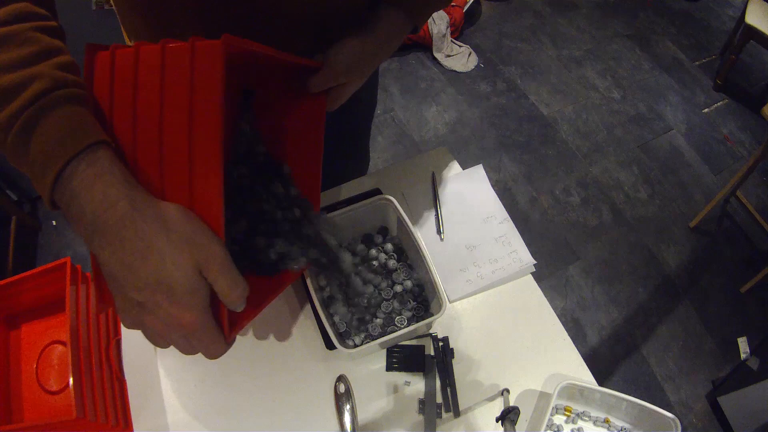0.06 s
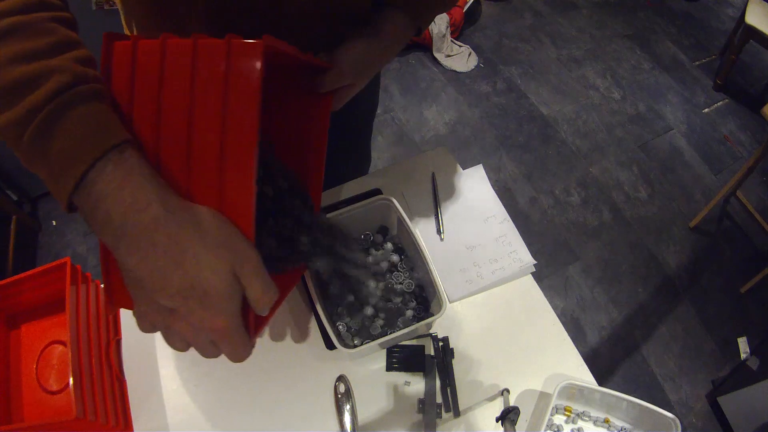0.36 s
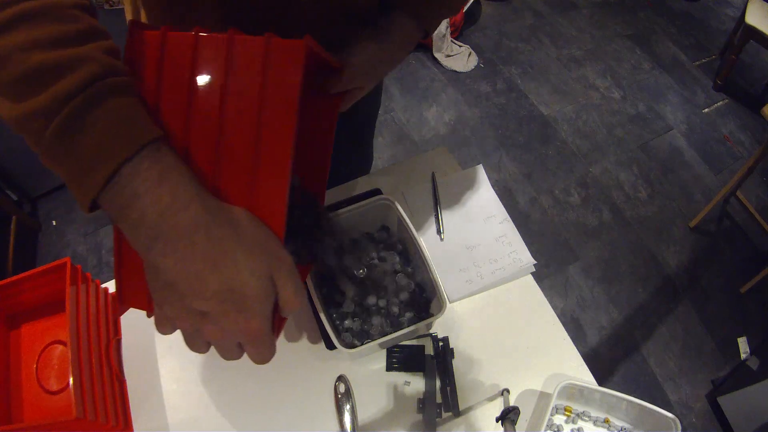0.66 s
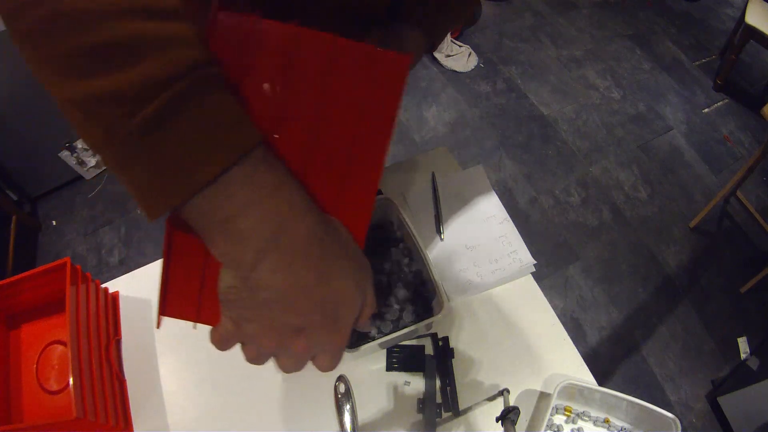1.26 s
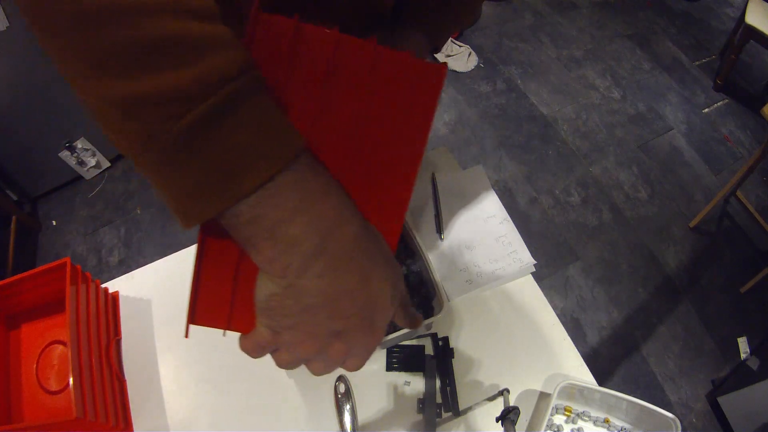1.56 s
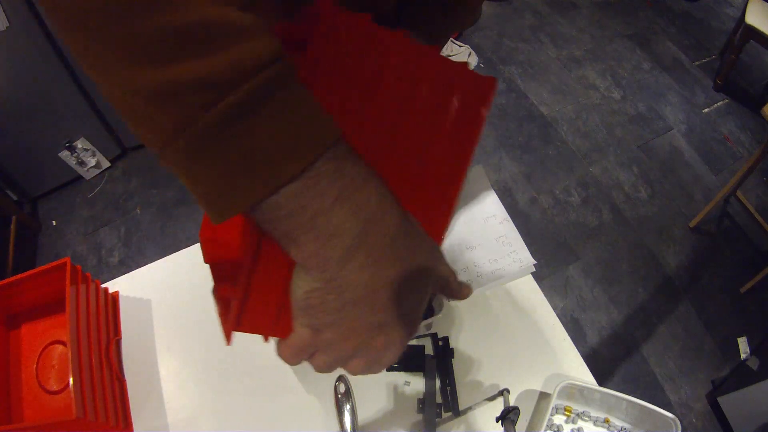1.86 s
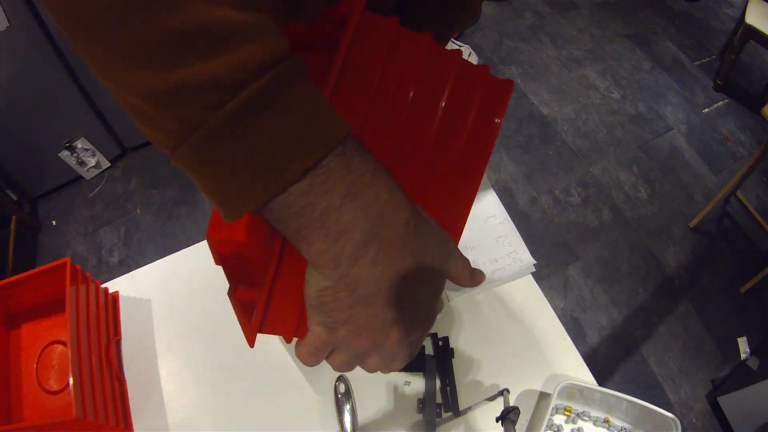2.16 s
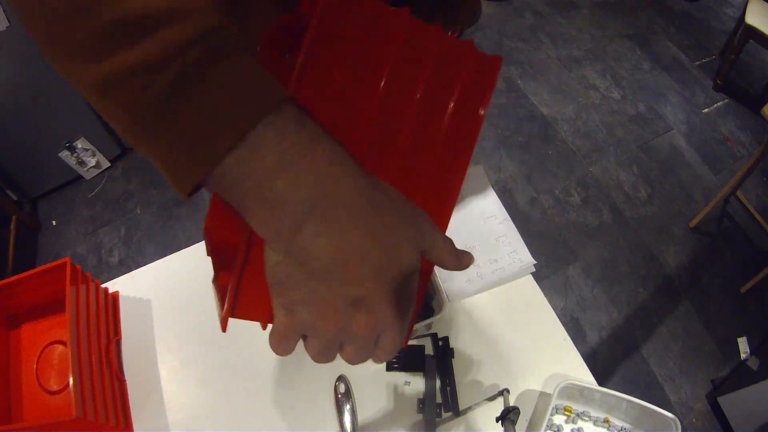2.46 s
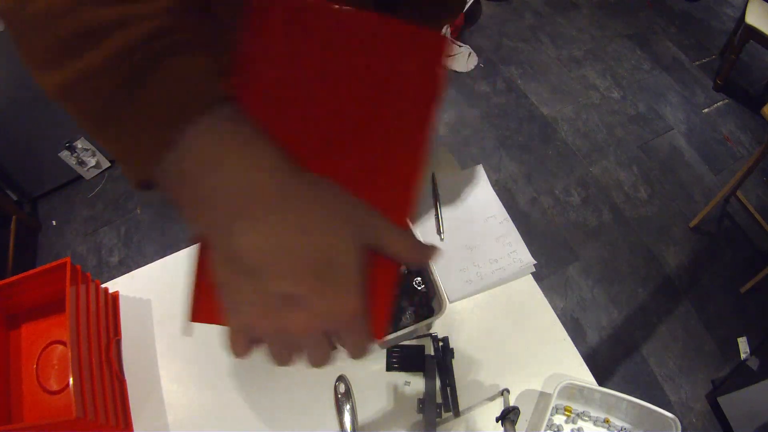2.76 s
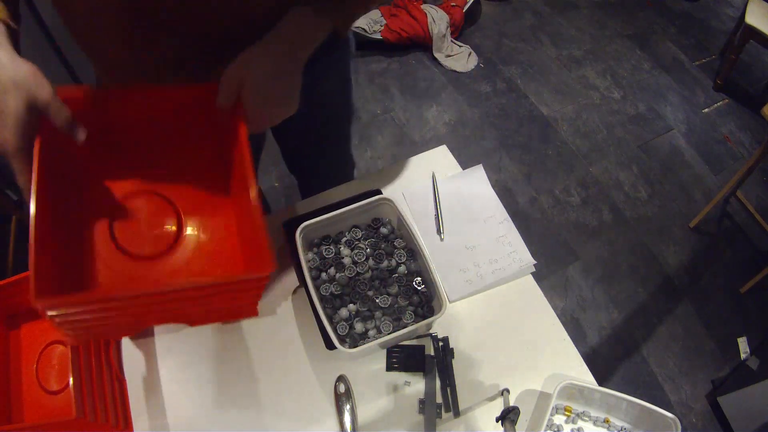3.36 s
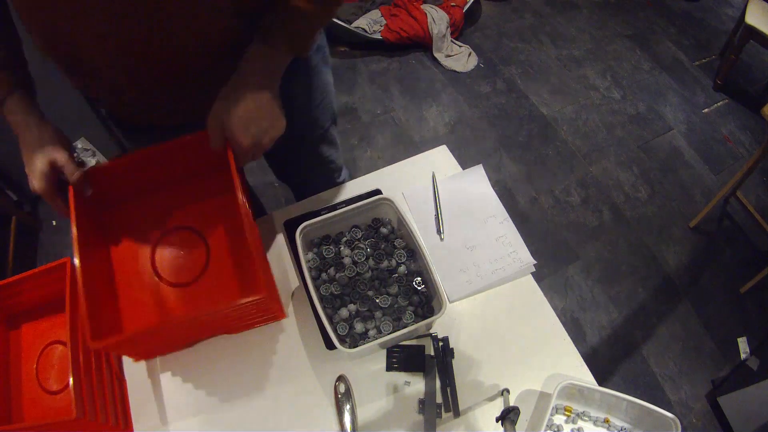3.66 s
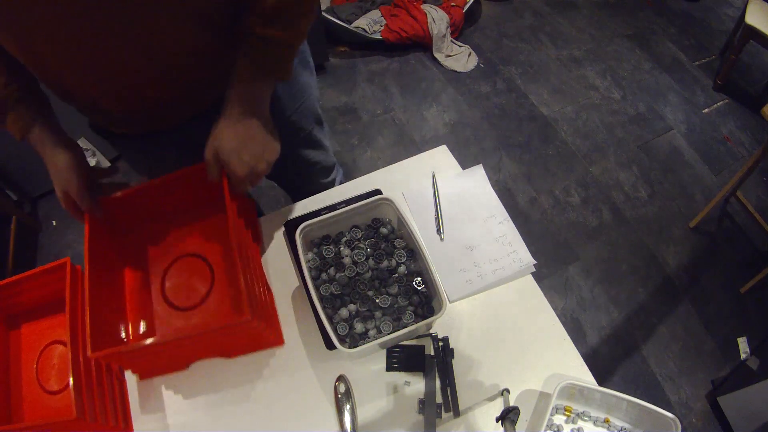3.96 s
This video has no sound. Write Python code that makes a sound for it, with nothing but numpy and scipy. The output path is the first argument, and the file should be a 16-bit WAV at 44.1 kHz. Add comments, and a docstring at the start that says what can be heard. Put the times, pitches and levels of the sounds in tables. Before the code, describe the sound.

Small hard plastic bricks pour from a bin into a tub on a table with a dense clatter that thins to stragglers. The empty bin is bumped softly, then set down with a hollow thud in a small room.

```python
"""A dense clatter of small hard plastic bricks, sliding from a tipped bin into a tub on a table.
Each impact clacks, rings the brick near 9 kHz and drums on bin, tub and table.
The stream thins to a few stragglers. The empty bin is bumped softly in the hands,
then set down with a hollow thud. A small room adds a short tail and a quiet room tone."""
import sys
import numpy as np
from scipy import signal
from scipy.fft import rfft, irfft
from scipy.io import wavfile
from scipy.ndimage import uniform_filter1d

SR = 44100
rng = np.random.default_rng(int(sys.argv[2]) if len(sys.argv) > 2 else 0)


def file_out(sig):
    """Save sig as 16-bit WAV at sys.argv[1]."""
    # one column per channel
    cols = np.atleast_2d(sig).T
    # limit, then scale
    lim = np.clip(cols, -1, 1)
    pcm = np.round(lim * 32767).astype(np.int16)
    wavfile.write(sys.argv[1], SR, pcm)


N = 176400

HAND_CONTACT_S, PUSH_PEAK_S = 0.00038, 0.0025


def amp(db):
    """Decibels to gain."""
    return 10 ** (np.asarray(db) / 20)


def unit(x):
    """Scale to energy 1."""
    return x / np.sqrt(np.sum(x ** 2) + 1e-20)


def seconds(size):
    """Time axis."""
    return np.arange(size) / SR


def add(mix, start_s, sound):
    """Mix a sound in at start_s."""
    part = mix[max(round(start_s * SR), 0):][:len(sound)]
    part += sound[:len(part)]


def conv(x, response):
    """Convolve, keeping the length."""
    return signal.oaconvolve(x, response)[:len(x)]


def colour(spectrum):
    """Minimum-phase response of energy 1 from rows of freq_hz, level_db."""
    freq_hz, level_db = np.transpose(spectrum)
    grid_hz = np.fft.rfftfreq(8192, 1 / SR)
    cepstrum = irfft(np.log(amp(np.interp(np.log(grid_hz + 1), np.log(freq_hz), level_db))))
    half = len(cepstrum) // 2
    cepstrum[1:half] *= 2
    cepstrum[half + 1:] = 0
    return unit(irfft(np.exp(rfft(cepstrum)))[:half])


def burst(t60_s, size):
    """Decaying noise: dense modes dying away together."""
    return unit(rng.standard_normal(size) * amp(-60 * seconds(size) / t60_s))


def scatter(hits, responses):
    """Each impact excites one response, picked at random."""
    which = rng.integers(0, len(responses), N)
    return sum(conv(hits * (which == k), response) for k, response in enumerate(responses))


def chatter(decay_s=0.0072, contacts_per_s=4000):
    """One knock: a first contact, then a quick dying run of others."""
    t = seconds(1400)
    hits = rng.standard_normal(len(t)) * (rng.random(len(t)) < contacts_per_s / SR)
    hits[0] = 1.1
    return unit(hits * np.exp(-t / decay_s))


def room_tone():
    """Steady noise, strongest in the low mids."""
    # freq_hz, level_db
    noise_spectrum = [(18, -52), (30, -13), (89, -8.5), (195, -4), (340, -1), (815, -2.5), (1440, -5),
                      (15000, -15.5)]
    return signal.fftconvolve(rng.standard_normal(N), colour(noise_spectrum))[:N]


def room(x, low_t60_s=0.5, high_t60_s=0.47, split_hz=4470, build_s=0.0072):
    """Short diffuse tail; the treble dies slightly sooner."""
    onset = np.minimum(seconds(20000) / build_s, 1)
    tail = 0
    for band, t60_s, level_db in ("low", low_t60_s, 0), ("high", high_t60_s, -3):
        decay = unit(burst(t60_s, len(onset)) * onset)
        tail += amp(level_db) * signal.lfilter(*signal.butter(3, split_hz, band, fs=SR), decay)
    return conv(x, tail)


def bin_boom(t60_scale, contact_s, low_cut_hz=126):
    """Hollow ring of the bin after a rounded push; damped by a load, longer when held empty."""
    # pitch_hz, level_db, unscaled_t60_s
    bin_modes = [(149.3, -12.5, 0.11), (177, -24, 0.16), (229.8, -1, 0.18), (310, -2.5, 0.068),
                 (446, -3, 0.086), (556, -1.5, 0.047), (620, -9.5, 0.18), (774, -6.5, 0.19)]
    t = seconds(16000)
    ring = sum(amp(db - 60 * t / (t60_s * t60_scale)) * np.cos(2 * np.pi * hz * t)
               for hz, db, t60_s in bin_modes)
    push = np.exp(-0.5 * ((t[:400] - PUSH_PEAK_S) / contact_s) ** 2)
    return signal.lfilter(*signal.butter(2, low_cut_hz, "high", fs=SR), conv(ring, push / push.sum()))


def handling():
    """Soft bumps on the bin as it is shaken out and turned upright."""
    # pitch_hz, level_db, t60_s
    wall_modes = [(350, -12, .14), (495, -6, 0.07), (562, 1.5, 0.07), (630, -14, 0.054), (810, -12, 0.089),
                  (940, -9, .19), (1005, -6, 0.15), (1250, -18, 0.07)]
    # start_s, boom_db, knock_db
    hand_bumps = [(2.403, -48.5, -46), (2.49, -60, -54), (3.143, -72, -23.5), (3.171, -82, -28.5),
                  (3.363, -64, -33), (3.396, -71, -35)]
    out, t = np.zeros(N), seconds(9000)
    wall = unit(sum(amp(db - 60 * t / t60_s) * np.sin(2 * np.pi * hz * t)
                    for hz, db, t60_s in wall_modes))
    for start_s, boom_db, knock_db in hand_bumps:
        add(out, start_s, amp(boom_db) * bin_boom(t60_scale=2.2, contact_s=HAND_CONTACT_S))
        add(out, start_s, amp(knock_db) * unit(wall + conv(wall, chatter())))
    return out


def set_down():
    """The bin's edges meet the table in quick succession, each with a boom and a tick."""
    # start_s, push_db, contact_s, tick_db
    edge_blows = [(3.9196, -5.5, 0.00063, -20), (3.9214, -40, 0.00096, -9), (3.9245, -6.5, 0.00059, -12),
                  (3.926, -6, 0.00051, -32), (3.9372, 2, 0.00064, -3)]
    # freq_hz, level_db
    tick_spectrum = [(200, -1.5), (700, 7), (1500, 0.5), (2200, -13.5), (2800, -11), (3700, -18.5),
                     (8000, -19.5), (12000, -20.5), (16000, -37)]
    out, tick = np.zeros(N), colour(tick_spectrum)
    for start_s, push_db, contact_s, tick_db in edge_blows:
        add(out, start_s - PUSH_PEAK_S, amp(push_db) * bin_boom(t60_scale=0.78, contact_s=contact_s))
        tail = amp(-4.5) * conv(burst(t60_s=0.051, size=4096), tick)
        add(out, start_s, amp(tick_db) * (tick + tail))
    return out


def panel(hits, spectrum, t60_s, spots):
    """Impacts drum on several spots of a panel."""
    return conv(scatter(hits, [burst(t60_s, size=6000) for _ in range(spots)]), colour(spectrum))


def hollow(hits, t60_s, width_hz=760):
    """The space over the heap resonates; its pitch moves as the bin tips and empties."""
    # time_s, pitch_hz
    cavity_glide = [(0, 1440), (.25, 1800), (.5, 2100), (1.1, 1870)]
    drive = scatter(hits, [burst(t60_s, size=3000) for _ in range(12)])
    pitch_hz = np.interp(seconds(N), *np.transpose(cavity_glide))
    carrier = np.exp(2j * np.pi * np.cumsum(pitch_hz) / SR)
    pole = np.exp(-np.pi * width_hz / SR)
    # moving band-pass: shift down, low-pass, shift back
    baseband = signal.lfilter([(1 - pole) ** 1.55], [1, -2 * pole, pole * pole], drive / carrier)
    return (carrier * baseband).real * np.sqrt(8)


def brick_ring(detune=0.011):
    """Ring of one brick, a little off its neighbours in pitch."""
    # pitch_hz, level_db, t60_s
    brick_modes = [(6390, -18, 0.02), (7270, -8.5, 0.019), (9120, 3, 0.03), (9580, -3.5, 0.025)]
    t, ring = seconds(2500), 0
    for pitch_hz, level_db, t60_s in brick_modes:
        pitch_hz *= 1 + detune * rng.standard_normal()
        ring += amp(level_db - 60 * t / t60_s) * np.sin(2 * np.pi * pitch_hz * t)
    return unit(ring)


def bricks(clacks, rings, variants=32, dull_from_s=0.74, dull_db_per_s=5, treble_hz=9950):
    """Brick on brick: a dry clack, smeared by close walls, and a short high ring."""
    # freq_hz, level_db
    clack_spectrum = [(300, -31.5), (1200, -8), (2400, -5.5), (3600, -2), (4800, 0), (5300, -5),
                      (7000, 1.5), (8200, -2.5), (10200, -6), (11200, -3.5), (13000, -8.5), (15300, -14)]
    shapes = [unit(burst(t60_s=0.004, size=2000) + amp(-3.5) * burst(t60_s=0.049, size=2000))
              for _ in range(variants)]
    clack = conv(scatter(clacks, shapes), colour(clack_spectrum))
    # slower bricks late in the pour are duller
    treble = signal.sosfiltfilt(signal.butter(6, treble_hz, "high", fs=SR, output="sos"), clack)
    treble_gain = amp(-dull_db_per_s * np.maximum(seconds(N) - dull_from_s, 0))
    ring = scatter(rings, [brick_ring() for _ in range(variants)])
    return clack - (1 - treble_gain) * treble + ring


def stream(size_spread_db=3.5, clump_db=1.53, clump_s=0.015):
    """Clumped impacts of random size, at mean power 1."""
    # time_s, impacts_per_s
    brick_flow = [(0, 2360), (0.802, 2780), (1.5, 2230), (2.0, 1000), (2.3, 640)]
    t = seconds(N)
    impacts_per_s = np.interp(t, *np.transpose(brick_flow))
    knots_s = np.cumsum(rng.exponential(1, 2000)) * clump_s
    clumps = np.interp(t, knots_s, rng.standard_normal(len(knots_s)))
    sizes = amp(size_spread_db * np.minimum(rng.standard_normal(N), 2) + clump_db * clumps)
    hits = sizes * (rng.random(N) < impacts_per_s / SR) * rng.choice([-1, 1], N)
    power = uniform_filter1d(uniform_filter1d(hits ** 2, size=3000), size=3000)
    return hits / np.sqrt(abs(power) + 1e-6)


def pour(fade_from_s=2.36, fade_db_per_s=65, ring_rise_db_per_s=1.8, bin_t60_s=0.029):
    """One stream of impacts drives the bricks, the bin, the tub and the table under it."""
    # time_s, bricks_db, bin_db, tub_db, table_db
    drive_levels = [(0.0, -24.5, -24.5, -41, -40), (0.04, -28, -25, -65, -51),
                    (0.06, -25.5, -26.5, -45, -49), (0.08, -32, -31.5, -33.5, -56),
                    (0.11, -27, -26, -40, -46), (0.6, -27.5, -27.5, -36.5, -45.5),
                    (0.72, -27, -30, -35.5, -46.5), (1.2, -30.5, -35.5, -35.5, -45.5),
                    (1.24, -30.5, -39.5, -35.5, -50.5), (1.46, -33.5, -40, -39.5, -49.5),
                    (1.85, -43.5, -54, -46, -54.5), (1.95, -46, -58, -46.5, -51),
                    (2.08, -58.5, -63, -54.5, -58.5), (2.27, -100, -72, -66, -69)]
    # hard landings and stragglers: start_s, clack_db, ring_db, tub_db
    landings = [(0.1203, 4, -4, -9), (.157, 1, -7, -19), (0.2373, -4, -9, -3.5), (.413, 2, -9, -20),
                (0.4627, 3, -9, -16), (0.5424, -3, -6, -3.5), (0.5987, 3, -13, -13), (0.8029, -2, -16, -6),
                (0.8677, -3, -4, -25), (0.9636, -9, 2, -27), (1.0425, -10, 0.5, -7.5),
                (1.1357, -12, -3.5, -12), (1.2303, -12, -6, -14), (1.3567, -7.5, -4, -9),
                (1.4303, -12, -12, -12), (1.4612, -14, -10, -11), (1.5254, -20, -8, -32),
                (1.6353, -21, -6, -28), (1.713, -14, -12, -34), (1.77, -24, -17, -30),
                (1.897, -21, -16, -19), (1.9339, -22, -12, -40), (1.9513, -13, -13, -17),
                (1.974, -16, -31, -27), (2.0226, -17.5, -25, -23), (2.0634, -23, -22, -34),
                (2.092, -25, -19.5, -25), (2.1117, -24, -21, -21), (2.243, -35, -47, -47),
                (2.288, -29, -44, -28), (2.2947, -35, -29, -30), (2.3662, -27.5, -38, -24),
                (2.401, -26, -42, -25)]
    # panel responses: freq_hz, level_db
    bin_spectrum = [(100, -30), (150, -13.5), (250, -28.5), (320, -22.5), (385, -5), (470, -14), (900, -7),
                    (1200, -5.5), (1400, -1), (2000, -1), (2900, -2.5), (4500, -7), (6000, -7.5),
                    (12000, -45)]
    tub_spectrum = [(150, -30), (350, -15.5), (430, -3.5), (500, -5.5), (570, -1), (710, -1.5), (850, -1.5),
                    (1020, 0), (1400, -6.5), (1680, -5), (2100, -18.5), (3000, -30.5)]
    table_spectrum = [(25, -35), (48, -17), (65, 4.5), (100, -3.5), (145, 3.5), (190, -8), (228, 9.5),
                      (275, -5.5), (350, 0), (450, -11.5), (900, -26)]
    t, hits = seconds(N), stream()
    times_s, *levels_db = np.transpose(drive_levels)
    fade_db = fade_db_per_s * np.maximum(t - fade_from_s, 0)
    on_bricks, on_bin, on_tub, on_table = [hits * amp(np.interp(t, times_s, db) - fade_db)
                                           for db in levels_db]
    clacks = amp(-1.5) * on_bricks
    # bricks ring more freely as the stream thins
    rings = amp(rng.uniform(-16.2, 0, N) + ring_rise_db_per_s * t) * on_bricks
    for start_s, clack_db, ring_db, tub_db in landings:
        contacts = chatter()
        add(clacks, start_s, amp(clack_db) * contacts)
        add(rings, start_s, amp(ring_db) * contacts)
        add(on_tub, start_s, amp(tub_db) * contacts)
    loaded_boom = unit(bin_boom(t60_scale=0.8, contact_s=HAND_CONTACT_S))
    return (bricks(clacks, rings)
            + amp(-0.4) * panel(on_bin, bin_spectrum, bin_t60_s, spots=24)
            + amp(-8) * hollow(on_bin, bin_t60_s)
            + amp(-0.5) * panel(on_tub, tub_spectrum, t60_s=0.072, spots=20)
            + amp(-2.5) * panel(on_table, table_spectrum, t60_s=0.14, spots=8)
            + amp(-9) * conv(on_table, loaded_boom))


def scene():
    """Pour, handling and thud over quiet room tone; mono."""
    rattle, thud = pour() + handling(), set_down()
    tone = amp(-60) * room_tone()
    reverb = room(amp(-8.5) * rattle + amp(-17) * thud)
    return (rattle + thud + reverb + tone)[None]


def record(dry):
    """Slow gain control ducks the ring of the thud; a low-pass follows."""
    limit_db, attack_s, recover_db_per_s, cutoff_hz = -18, 0.017, 5, 15380
    pole = np.exp(-1 / (attack_s * SR))
    level_db = 10 * np.log10(signal.lfilter([1 - pole], [1, -pole], dry[0] ** 2) + 1e-12)
    recovery_db = recover_db_per_s * seconds(N)
    held_db = np.maximum.accumulate(level_db + recovery_db) - recovery_db
    over_db = np.maximum(held_db - limit_db, 0)
    ducked = dry * amp(-uniform_filter1d(over_db, size=200))
    low_pass = signal.firwin(801, cutoff_hz, window=("kaiser", 9), fs=SR)
    return signal.oaconvolve(np.pad(ducked, ((0, 0), (400, 400)), "edge"), low_pass[None], "valid")


dry = scene()
out = record(dry)
file_out(out)
```